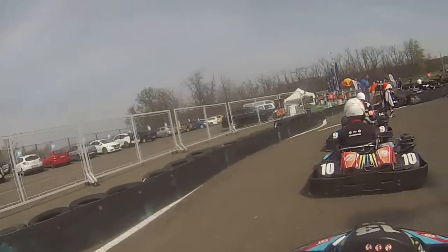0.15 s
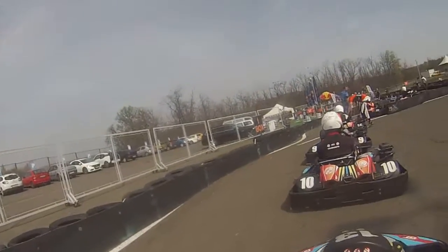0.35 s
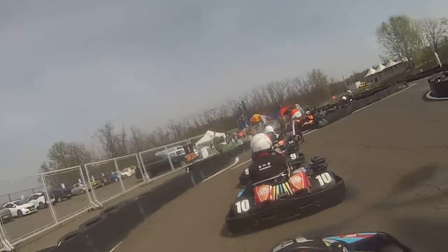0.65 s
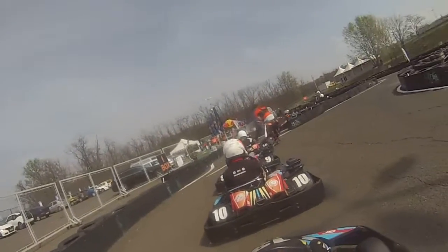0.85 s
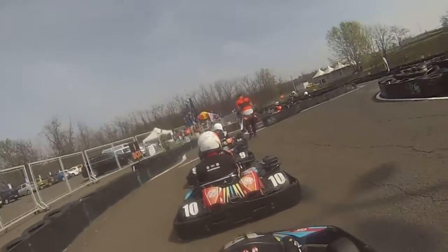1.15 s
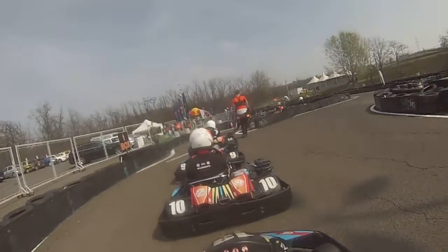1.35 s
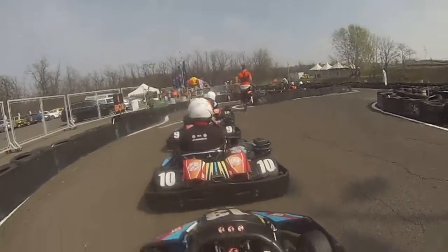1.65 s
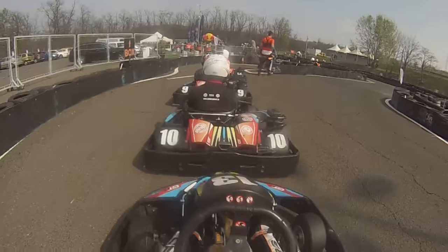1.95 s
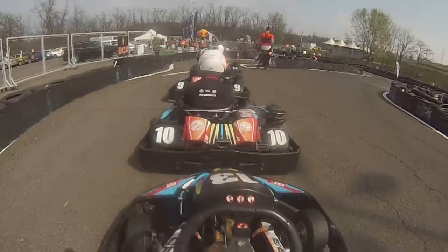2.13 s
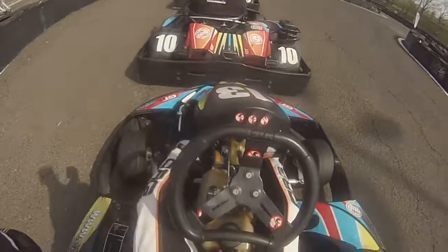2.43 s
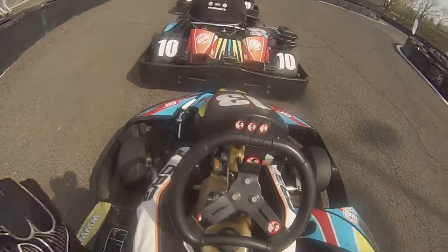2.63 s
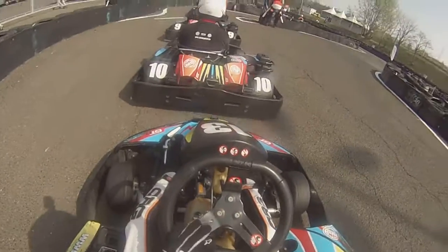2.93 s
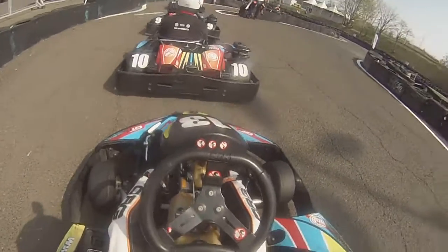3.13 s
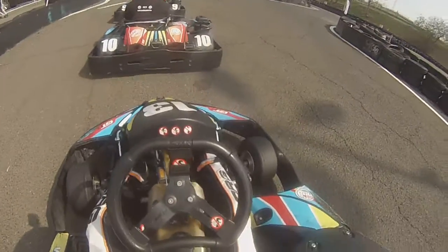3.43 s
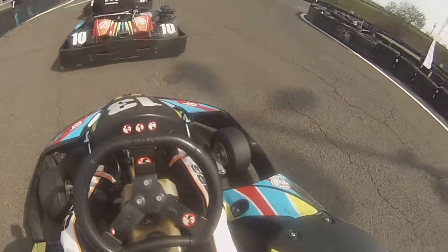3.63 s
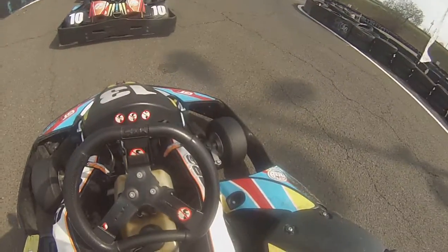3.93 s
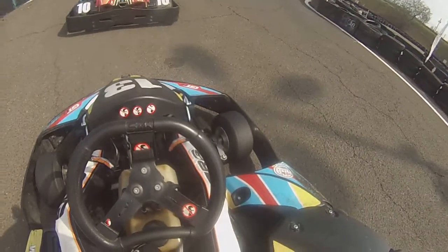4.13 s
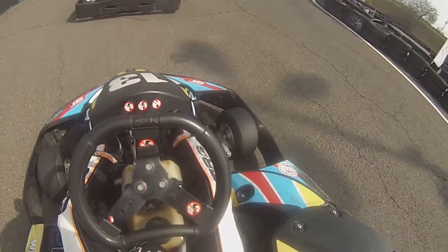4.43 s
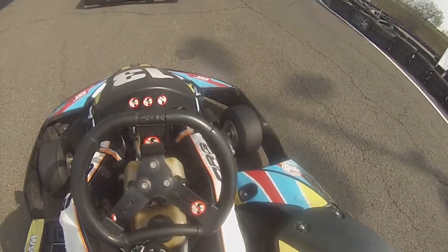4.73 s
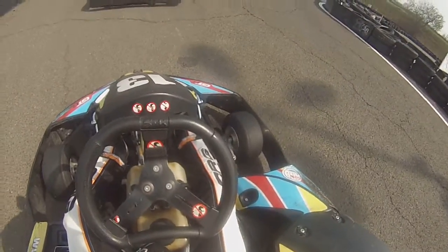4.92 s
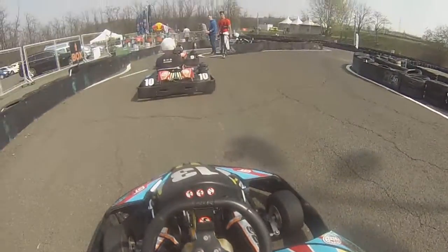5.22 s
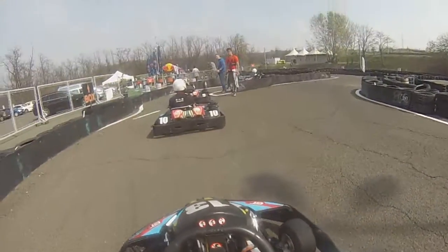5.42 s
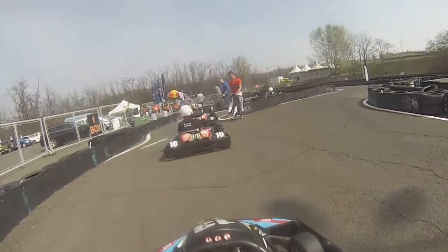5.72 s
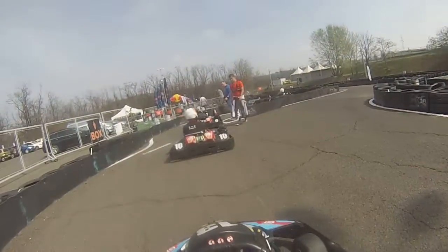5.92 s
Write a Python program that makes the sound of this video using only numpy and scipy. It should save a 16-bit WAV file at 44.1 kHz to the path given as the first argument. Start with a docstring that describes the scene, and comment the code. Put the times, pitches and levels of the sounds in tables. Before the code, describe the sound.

Heard from a helmet on a kart track, a go-kart engine rumbles and ticks at low revs after a short blip of throttle, with soft tyre noise behind it. A quick cluster of very close, hollow thumps and a sharp visor snap briefly pushes the engine down. The idling throb returns, and two more short throttle blips follow, the first one booming through the kart's frame.

```python
"""On a kart track, at the driver's helmet: a one-cylinder four-stroke kart rolls along near idle,
with three blips of throttle. The crank shakes the frame and the firings make it boom. Exhaust puffs,
piston slaps and valve taps repeat every engine cycle, louder with revs and throttle, over a wash of
tyres and other karts. Around two seconds a gloved hand knocks the visor, making thuds and plastic
clacks, and the sound of the engine and track dips briefly."""
import sys
import numpy as np
from scipy import signal
from scipy.fft import rfft, irfft, next_fast_len
from scipy.io import wavfile
from scipy.ndimage import uniform_filter1d

SR = 44100
rng = np.random.default_rng(int(sys.argv[2]) if len(sys.argv) > 2 else 0)


def persist_wave(psi):
    """Save psi, clipped to +-1, as 16-bit WAV."""
    counts = np.round(np.clip(psi, -1, 1) * 32767).astype(np.int16)
    wavfile.write(sys.argv[1], SR, np.atleast_2d(counts).T)


N = 267687
TIME = np.arange(N) / SR
IDLE_HZ = 27  # crank turns per second at idle
TOP_HZ = 15250  # treble above this is cut

# How fast the engine spins: time_s, turns_per_s
CRANK_SPEED = [(0.0, 30.56), (0.063, 31.92), (0.351, 39.8), (0.646, 32.96), (1.207, 29.13), (2.169, 27.26),
               (2.495, 28.03), (2.737, 26.98), (3.159, 27.31), (3.622, 26.46), (3.827, 26.81),
               (4.709, 26.3), (5.003, 41.99), (5.333, 34.7), (5.449, 35.53), (5.698, 46.85), (6.005, 38.22),
               (6.07, 37.87)]
# How hard the crank shakes the frame: time_s, level_db
SHAKE_LEVEL = [(0, -28.5), (0.18, -26), (0.47, -25), (0.6, -34), (0.72, -32.5), (1.35, -44), (1.8, -37),
               (2.7, -32.5), (3.4, -46), (4.0, -33), (4.6, -30), (5.0, -35), (5.5, -30.5), (5.63, -38.1),
               (5.78, -24.5), (5.92, -34.5), (6.07, -30.7)]
# The frame's boom, strong where the engine labours or revs through its resonance: time_s, level_db
BOOM_LEVEL = [(0, -49), (0.33, -34.5), (0.6, -43.5), (1.8, -55), (2.54, -26), (2.72, -39), (2.9, -37.5),
              (3.22, -48.5), (3.6, -39), (4.1, -28), (4.55, -29), (4.74, -35), (4.94, -24.5), (5.04, -14),
              (5.17, -31.4), (5.4, -39.5), (6.07, -46)]
# The tones that make up a firing pulse: multiple_of_firing_rate, level_db
FIRING_TONES = [(3, 2), (4, 0), (5, -7), (6, -10), (7, -18)]

# Blows within one engine cycle (two crank turns): place_in_cycle, decay_cycles, level_db
EXHAUST_PUFFS = [(0.131, 0.79, -4.5), (0.52, 0.12, -4.5), (0.72, 0.66, -7)]
PISTON_SLAPS = [(0.16, 0.32, -15.5), (.81, 0.071, -14), (0.902, 0.22, -11.5)]
VALVE_TAPS = [(.17, .15, -2), (.43, .08, 0), (.53, .08, -1), (.82, .05, -12)]
# The bass-to-treble balance of the exhaust, engine block, valves and gas hiss: frequency_hz, gain_db
EXHAUST_COLOUR = [(50, -38), (110, -13), (155, 1), (220, -4.5), (330, -12.5), (450, -12), (650, -18.5),
                  (1100, -28.5), (3000, -45.5)]
BLOCK_COLOUR = [(200, -17.5), (600, -12.5), (1020, -19.5), (1250, -9), (1500, -4.5), (1850, -6),
                (2350, -15.5), (2750, -16.5), (4000, -14.5), (9000, -39)]
VALVE_COLOUR = [(600, -15), (1600, -3.5), (2300, 7), (2550, 5.5), (2850, -2), (3400, -5), (4200, -1.5),
                (5300, -5), (5800, -7), (6800, -10.5), (9000, -14), (10500, -24.5), (12500, -28),
                (15000, -34)]
HISS_COLOUR = [(2500, -10), (5500, -22), (6700, -3.5), (9000, 6), (10500, -12.5), (12000, -11),
               (13200, -15), (14000, -32)]
# Pitches that the engine and frame boost or weaken: frequency_hz, width_hz, boost_db
ENGINE_RESONANCES = [(301, 24, 5), (795, 19, 12), (1173, 13, 6.5), (1421, 194, 13.5), (1795, 23, 5.5),
                     (2178, 52, 10), (2377, 40, 10), (3010, 50, 4), (3526, 180, -7), (3600, 56, 10.5),
                     (3955, 220, 9), (4490, 165, -6.5), (4540, 43, 12.5), (4910, 145, 7), (5380, 110, 9),
                     (5600, 270, -11), (6460, 340, 5), (6720, 110, 9.5), (7640, 290, -5.5), (7700, 200, 9),
                     (8460, 350, -18), (8640, 140, 2.5), (10750, 540, 0), (11800, 300, 7)]
# How strongly the kart's din reaches the helmet: time_s, gain_db
DIN_LEVEL = [(0, -0.5), (.5, 1.5), (1.0, 0.4), (1.45, -2), (2.1, 3), (2.52, 5.5), (2.84, 4.5), (3.03, -0.4),
             (3.8, -.5), (4.5, 2.2), (4.75, 0.1), (5.0, 3.5), (5.35, -1), (5.6, 1), (6.07, -1)]
# How loud each part gets: idle_db, db_per_doubling_of_revs, full_throttle_extra_db, db_per_din_db
EXHAUST_LOUDNESS = (-52.5, 4.5, 4.5, 1.4)
BLOCK_LOUDNESS = (-50, 9, 1.1, 0.25)
VALVE_LOUDNESS = (-53, 4, 0.9, 0.87)
FIN_LOUDNESS = (-57.5, 9, 0.8, -0.23)
TRACK_LOUDNESS = (-52, 5.5, 2.8, 1.1)

# The tones of the cylinder's cooling fins: pitch_hz, ring_s (time to fade by 60 dB), level_db
FIN_TONES = [(1370, 0.06, -5.5), (1451, 0.064, 5.5), (1486, 0.036, -3), (3920, 0.025, -6)]
# The honk of the air intake: time_s, level_db
HONK_LEVEL = [(0, -62), (.33, -39.5), (.7, -52), (1.3, -54.5), (1.65, -51.5), (2.7, -47.5), (3.2, -62),
              (4.4, -52.5), (4.8, -55.5), (5.0, -42), (5.35, -59), (5.65, -43), (6.07, -65)]
# The honk jumps higher at high revs: turns_per_s, pitch_hz
HONK_PITCH = [(27, 298), (39.5, 305), (42, 360), (47, 385)]
# Gas hissing through the open valve: time_s, level_db
HISS_LEVEL = [(0, -68), (.8, -64.5), (1.5, -74), (2.1, -72.5), (2.5, -65.5), (2.88, -68), (3.02, -78),
              (4.7, -74), (5, -68), (6.07, -71)]
# The knock of slack in the drive, hardest at the lowest revs: turns_per_s, level_db
SLACK_LEVEL = [(26.4, -54), (28.5, -71), (42, -60.5)]
# The metal tones of that knock: pitch_hz, ring_s, level_db
SLACK_TONES = [(783, 0.18, -7.5), (818, 0.13, -3), (1172, 0.19, -3.5)]

# The helmet rocks on its padding: start_s, peak_db, pitch_hz, ring_s
THUDS = [(1.863, -18.5, 58.3, 0.13), (1.91, -9.5, 70, 0.058), (1.955, -17.5, 61, 0.36),
         (2.19, -3.5, 72.4, 0.17), (2.215, -3.5, 88, 0.036), (2.298, -12.5, 71.6, 0.21),
         (2.327, -9.5, 59, 0.37), (2.477, -23, 61.5, 0.24)]
# Glove and visor strike the shell: start_s, knock_db, clack_db, scrape_s, brightness_hz
KNOCKS = [(1.892, -27, -26, 0.0062, 2200), (1.896, -14, -25, 0.0058, 2200), (1.906, -20, -27, 0.0038, 2000),
          (2.135, -19, -30, .005, 2500), (2.193, -40.5, -19, 0.0018, 15000),
          (2.208, -10.5, -5.5, 0.0028, 11000), (2.217, -5.5, -18, 0.0045, 8000),
          (2.236, -13, -13.5, 0.0035, 7000), (2.246, -9, -14.5, 0.0043, 6040),
          (2.262, -12.5, -28, 0.012, 3960), (2.285, -15, -23.5, 0.005, 3500),
          (2.2944, -10.5, -13, 0.0015, 12000), (2.302, -19, -25, 0.014, 2570)]
# The tones of the helmet's shell: pitch_hz, ring_s, level_db
SHELL_TONES = [(156.4, 0.24, 5.5), (209, 0.061, 2), (261, 0.11, 0), (286.5, 0.086, 9.5), (339, 0.15, -1),
               (417, 0.1, -33.5), (554, 0.028, -15.5), (740, 0.034, -12.5)]
# The bass-to-treble balance of the visor's clack: frequency_hz, gain_db
VISOR_COLOUR = [(200, -5.5), (600, -3.5), (950, -21.5), (1170, -2.5), (1430, 0.5), (1700, -5), (2100, 1),
                (2500, -10), (3300, -17), (4100, -19), (5400, -24.5), (6500, -34.5), (10000, -47.5),
                (15000, -52)]
# Pitches that the visor boosts or weakens: frequency_hz, width_hz, boost_db
VISOR_RESONANCES = [(1100, 10, 7.5), (1380, 140, 0.5), (1910, 35, -1), (2047, 20, -4), (2130, 34, 2.5),
                    (2940, 29, -2.5), (3980, 250, 6.5), (4380, 42, 0.5)]
# The visor's latch snaps with the sharpest contacts: start_s, level_db
LATCH_SNAPS = [(2.195, -35), (2.208, -4), (2.225, -27), (2.2365, -27), (2.2944, -25)]
# The tones of the latch: pitch_hz, ring_s, level_db
LATCH_TONES = [(1230, .026, -3), (1440, .028, 0), (1690, .022, -5), (1970, .028, -1), (2240, .024, -2),
               (5400, .009, -17)]

# The wash of tyres and other karts: frequency_hz, gain_db
TRACK_COLOUR = [(59, -38.5), (100, 1.5), (154, -2), (238, -16), (312, -14.5), (400, -12), (1060, -9),
                (1440, -12), (1920, -15.5), (2270, -4), (2730, -18.5), (3890, -23.5), (5870, -24.5),
                (6650, -23.5), (14000, -49)]
# The springless frame jolting over the asphalt: frequency_hz, gain_db
ROAD_COLOUR = [(8, 4), (14, 4.5), (30, -3.5), (60, 10), (90, -0.5), (130, 2), (400, -66)]


def frame_rumble(cycle, frame_hz=60, frame_width_hz=16, rough_db=-13, unsteady_db=1.5):
    """The off-balance crank shakes the kart once a turn, and the firings boom in the frame."""
    angle = 2 * np.pi * (cycle - .12)  # the firing comes a little way into the cycle
    shake = np.sqrt(2) * np.sin(2 * (angle + .06 * wander(14)))
    firings = -sum(undb(db) * np.sin(multiple * angle) for multiple, db in FIRING_TONES)
    firings = firings * undb(.9 * wander(22)) + undb(rough_db) * unit(wander(200))
    frame = signal.iirpeak(frame_hz, frame_hz / frame_width_hz, SR)
    boom = signal.lfilter(*frame, signal.lfilter(*frame, firings))
    boom = boom / np.sqrt(uniform_filter1d(boom ** 2, size=3300))  # even out, so the table sets the level
    shake_db = look_up(SHAKE_LEVEL) + unsteady_db * wander(10)
    return shake * undb(shake_db) + boom * undb(look_up(BOOM_LEVEL))


def engine_clatter(cycle, revs):
    """The exhaust puffs, the piston slaps the block and the valves tap, over a churn of moving parts."""
    puffs = blows(cycle, EXHAUST_PUFFS, rise=.0037, scatter_db=2.5, jitter=.0077)
    slaps = blows(cycle, PISTON_SLAPS, rise=.025, scatter_db=1, jitter=.006)
    taps = blows(cycle, VALVE_TAPS, rise=.03, scatter_db=1.2, jitter=.006)
    # The small added numbers keep the churn going between blows.
    puffs = (puffs + .4) * grit(spread_db=2) + undb(-11) * onsets(puffs)
    slaps = (slaps + .11) * grit(spread_db=1.5) + undb(-24) * onsets(slaps)
    taps = (taps + .07) * grit(spread_db=1)
    exhaust = unit(colour(puffs, EXHAUST_COLOUR, ENGINE_RESONANCES)) * loudness(EXHAUST_LOUDNESS, revs)
    block = unit(colour(slaps, BLOCK_COLOUR, ENGINE_RESONANCES)) * loudness(BLOCK_LOUDNESS, revs)
    valves = unit(colour(taps, VALVE_COLOUR, ENGINE_RESONANCES)) * loudness(VALVE_LOUDNESS, revs)
    return exhaust + block + valves


def fin_pings(cycle, revs):
    """The sharp start of each piston slap rings the cooling fins, harder at high revs."""
    hits = onsets(blows(cycle, PISTON_SLAPS, rise=.006, scatter_db=1.2, jitter=.008))
    return unit(signal.fftconvolve(hits, ring(FIN_TONES))[:N]) * loudness(FIN_LOUDNESS, revs)


def intake_honk(cycle, revs, width_hz=80):
    """Each gulp of air rings the airbox in a low, breathy honk."""
    gulps = blows(cycle, [(.45, .35, 0)], rise=.05, scatter_db=1, jitter=.005)
    air = (gulps + .5) * rng.standard_normal((2, N))
    flutter = signal.lfilter(*signal.butter(2, width_hz / 2, fs=SR), air)
    # Slow noise times a tone gives a narrow band of noise around that pitch.
    angle = 2 * np.pi * np.cumsum(look_up(HONK_PITCH, revs)) / SR
    honk = flutter[0] * np.sin(angle) + flutter[1] * np.cos(angle)
    return unit(honk) * undb(look_up(HONK_LEVEL))


def valve_hiss(cycle):
    """A short, bright rush of gas escapes as a valve lifts."""
    opening = blows(cycle, [(.18, .05, -6), (.44, .07, 0)], rise=.03, scatter_db=1, jitter=.005)
    gas = colour(opening * rng.standard_normal(N), HISS_COLOUR, ENGINE_RESONANCES)
    return unit(gas) * undb(look_up(HISS_LEVEL))


def drive_knock(cycle, revs):
    """Just after each firing, the drive takes up its slack with a ringing metal knock."""
    hits = onsets(blows(cycle, [(.2, .1, 0)], rise=.001, scatter_db=1.5, jitter=.008))
    return unit(signal.fftconvolve(hits, ring(SLACK_TONES))[:N]) * undb(look_up(SLACK_LEVEL, revs))


def helmet_thuds(rise_s=.0013):
    """Each shove rocks the helmet on its padding in a low swing that dies away."""
    out = np.zeros(N)
    for start_s, peak_db, pitch_hz, ring_s in THUDS:
        start = int(start_s * SR)
        t = TIME[:min(N - start, SR)]
        swing = fading_tone(t, pitch_hz, ring_s) * (1 - np.exp(-t / rise_s))
        out[start:start + len(t)] += undb(peak_db) * swing / np.abs(swing).max()
    return out


def visor_knocks(rattle_db=-22, rattle_s=.017):
    """Each contact rings the shell and scrapes the visor, which rattles on; soft contacts are duller."""
    shell = ring(SHELL_TONES)
    t = TIME[:len(shell)]
    hollow, scrapes = np.zeros(N), np.zeros(N)
    contacts = grit(spread_db=0)
    for start_s, knock_db, clack_db, scrape_s, brightness_hz in KNOCKS:
        span = slice(int(start_s * SR), int(start_s * SR) + len(t))
        hollow[span] += undb(knock_db) * shell
        fade = np.exp(-t / scrape_s) + undb(rattle_db) * np.exp(-t / rattle_s)
        treble_cut = signal.butter(2, brightness_hz, fs=SR)
        scrapes[span] += undb(clack_db) * signal.lfilter(*treble_cut, contacts[span] * fade)
    return hollow + undb(6.5) * colour(scrapes, VISOR_COLOUR, VISOR_RESONANCES)


def latch_snaps(crack_db=-31, crack_s=.0012, rise_s=.0004):
    """The visor's latch snaps with a tiny, bright crack and a brief plastic ring."""
    latch = ring(LATCH_TONES)
    t = TIME[:len(latch)]
    latch = latch * (1 - np.exp(-t / rise_s))
    crack_fade = undb(crack_db) * np.exp(-t / crack_s)
    bright_noise = np.diff(rng.standard_normal(N + 1)) / 2
    out = np.zeros(N)
    for start_s, level_db in LATCH_SNAPS:
        span = slice(int(start_s * SR), int(start_s * SR) + len(t))
        out[span] += undb(level_db) * (latch + crack_fade * bright_noise[span])
    return out


def track_wash(revs):
    """Tyres on asphalt and the karts ahead blend into a wash that swells with the pace."""
    wash = unit(colour(rng.standard_normal(N), TRACK_COLOUR))
    return wash * loudness(TRACK_LOUDNESS, revs) * undb(wander(4.68))


def road_rumble(level_db=-48):
    """The rolling wheels jolt the frame in a low, uneven rumble."""
    return unit(colour(rng.standard_normal(N), ROAD_COLOUR)) * undb(level_db + 2 * wander(17))


def level_dip(start_s=2.21, fall_s=.029, creep_s=.21, return_s=.043):
    """A gain that drops at the hardest knock, creeps partway back, then returns quickly."""
    times = start_s + np.cumsum([0, fall_s, creep_s, return_s])
    return undb(np.interp(TIME, times, [0, -21, -11, 0]))


def throttle(revs, coast_s=.4, full_pull_hz_per_s=75):
    """How far the throttle must open (0 to 1) to speed the crank up and hold it against drag."""
    pull = np.gradient(revs) * SR + (revs - IDLE_HZ) / coast_s
    return uniform_filter1d(np.clip(pull / full_pull_hz_per_s, 0, 1), size=SR // 10)


def loudness(rule, revs):
    """The gain of one part, from the revs, the throttle and how much din reaches the helmet."""
    idle_db, doubling_db, throttle_db, din_share = rule
    effort_db = doubling_db * np.log2(revs / IDLE_HZ) + throttle_db * throttle(revs)
    return undb(idle_db + effort_db + din_share * look_up(DIN_LEVEL))


def blows(cycle, table, rise, scatter_db, jitter):
    """The swell and fade of repeating blows, uneven in timing and strength; times are in cycles."""
    power = 0
    for place, decay, level_db in table:
        position = cycle - place + jitter * wander(20) + 2
        count, age = position.astype(int), position % 1
        strengths = undb(level_db + scatter_db * rng.standard_normal(256))
        swell = (1 - np.exp(-age / rise)) * np.exp(-age / decay)
        power = power + (strengths[count] * swell) ** 2
    return np.sqrt(power)


def onsets(swell):
    """Keep only the sharp start of each blow, as a pulse."""
    return unit(np.maximum(np.diff(swell, prepend=swell[0]), 0))


def grit(spread_db):
    """The noise of many tiny contacts; more spread makes them more unequal."""
    return unit(rng.standard_normal(N) * undb(spread_db * wander(2000)))


def ring(tones):
    """Half a second of a struck object's fading tones, with a peak of 1."""
    t = TIME[:SR // 2]
    sound = sum(undb(db) * fading_tone(t, pitch_hz, ring_s) for pitch_hz, ring_s, db in tones)
    return sound / np.abs(sound).max()


def fading_tone(t, pitch_hz, ring_s):
    """A pure tone that fades by 60 dB in ring_s."""
    return np.sin(2 * np.pi * pitch_hz * t) * np.exp(-np.log(1000) * t / ring_s)


def colour(sound, balance, resonances=()):
    """Shape a sound's bass-to-treble balance, then add narrow peaks and hollows."""
    size = 2 * next_fast_len(N)
    hz = np.maximum(np.fft.rfftfreq(size, 1 / SR), 1)
    points_hz, points_db = np.transpose(balance)
    gain = undb(np.interp(np.log(hz), np.log(points_hz), points_db))
    for centre_hz, width_hz, boost_db in resonances:
        distance = 2 * (hz - centre_hz) / width_hz
        gain = gain * np.sqrt(1 + (undb(boost_db) ** 2 - 1) / (1 + distance ** 2))
    # Fold the filter in time so that it rings after each hit, never before.
    cepstrum = irfft(np.log(gain))
    cepstrum[1:size // 2] *= 2
    cepstrum[size // 2 + 1:] = 0
    return irfft(rfft(sound, size) * np.exp(rfft(cepstrum)))[:N]


def wander(rate_hz):
    """A smooth random drift, about 1 in size, that heads somewhere new rate_hz times a second."""
    hold = max(int(SR / rate_hz), 1)
    steps = np.repeat(rng.standard_normal(N // hold + 1), hold)
    return 1.76 * uniform_filter1d(uniform_filter1d(steps, hold), hold)[:N]


def look_up(table, at=TIME):
    """Read a two-column table along straight lines between its rows."""
    return np.interp(at, *np.transpose(table))


def undb(db):
    """Turn decibels into a gain to multiply by."""
    return 10 ** (np.asarray(db) / 20)


def unit(sound):
    """Scale a sound to an average (rms) level of 1."""
    return sound / np.sqrt(np.mean(sound ** 2))


def scene():
    """Mix the engine and track with the knocks on the helmet, in one channel."""
    revs = look_up(CRANK_SPEED)  # crank turns per second
    cycle = np.cumsum(revs) / SR / 2  # a four-stroke fires every second turn
    engine = frame_rumble(cycle) + engine_clatter(cycle, revs) + fin_pings(cycle, revs)
    engine += intake_honk(cycle, revs) + valve_hiss(cycle) + drive_knock(cycle, revs)
    background = track_wash(revs) + road_rumble()
    helmet = helmet_thuds() + visor_knocks() + latch_snaps()
    return ((engine + background) * level_dip() + helmet)[None]


def record(dry):
    """Round off the loudest peaks and cut the highest treble."""
    treble_cut = signal.ellip(8, .2, 70, TOP_HZ, fs=SR, output="sos")
    return signal.sosfilt(treble_cut, np.tanh(dry))


dry = scene()
out = record(dry)
persist_wave(out)
```